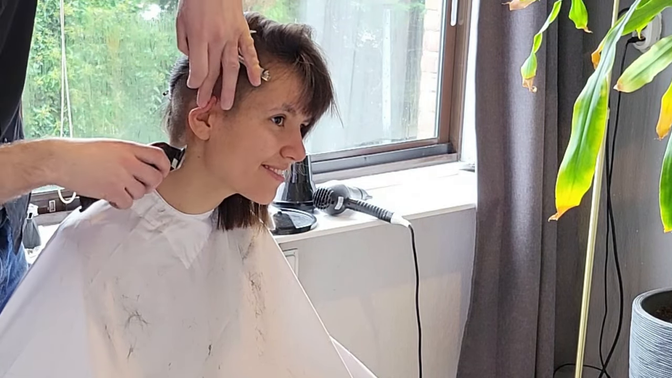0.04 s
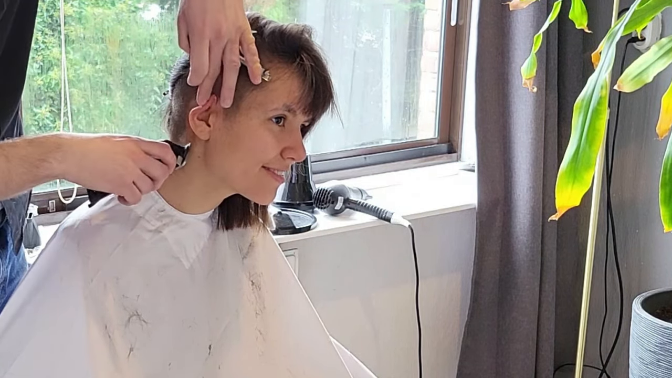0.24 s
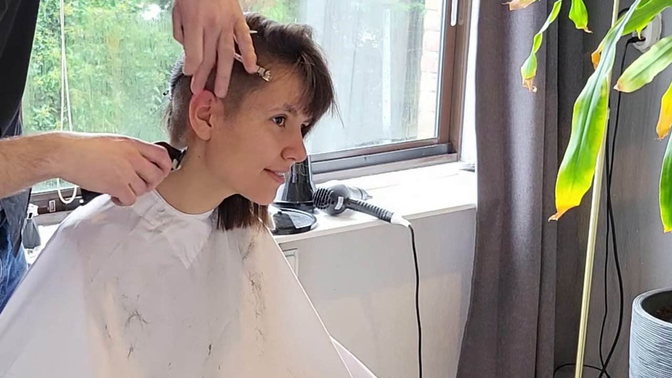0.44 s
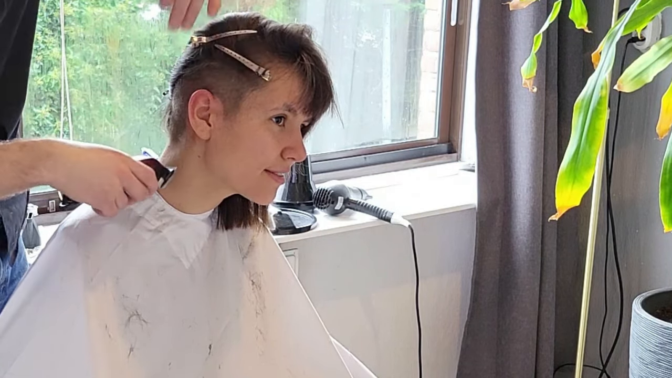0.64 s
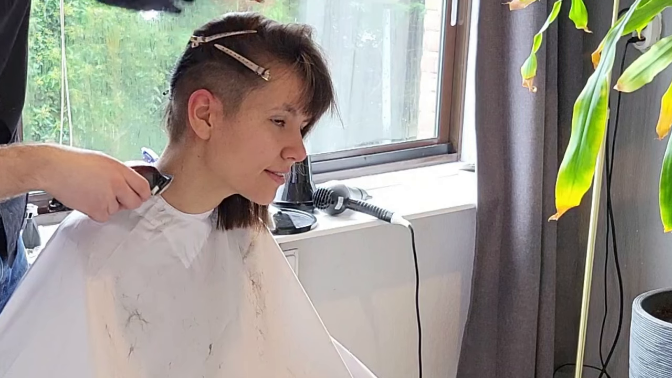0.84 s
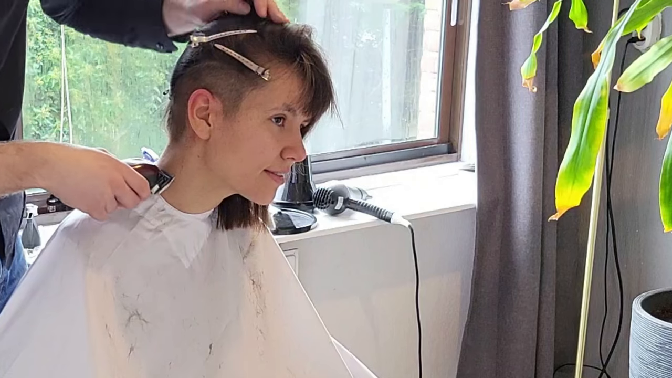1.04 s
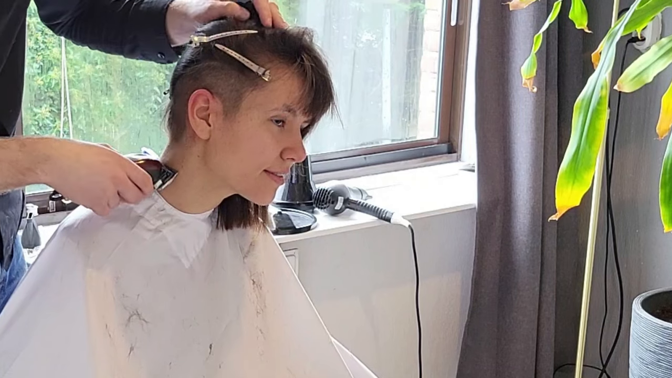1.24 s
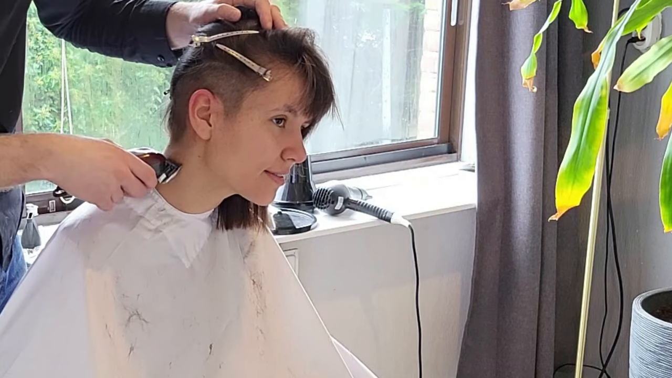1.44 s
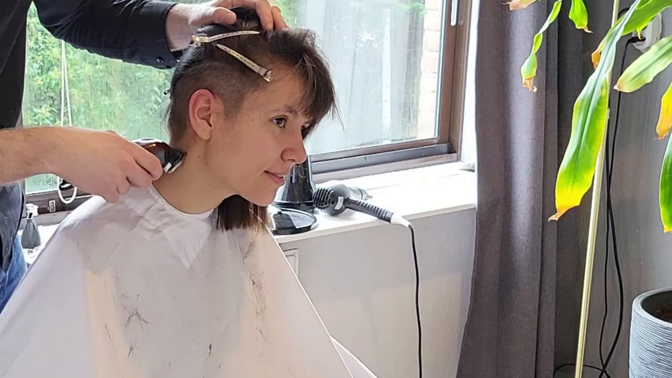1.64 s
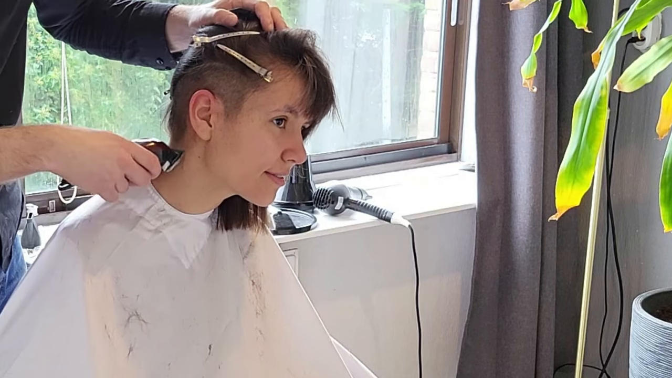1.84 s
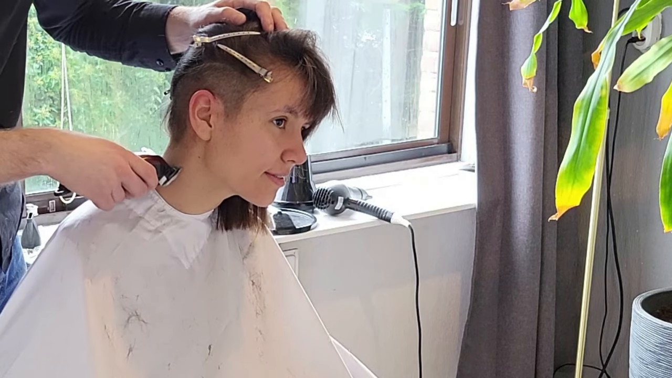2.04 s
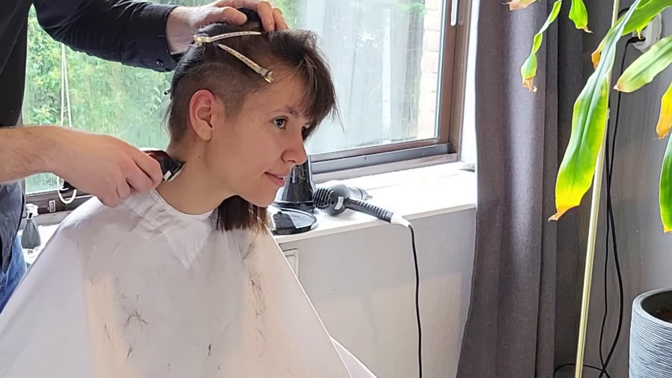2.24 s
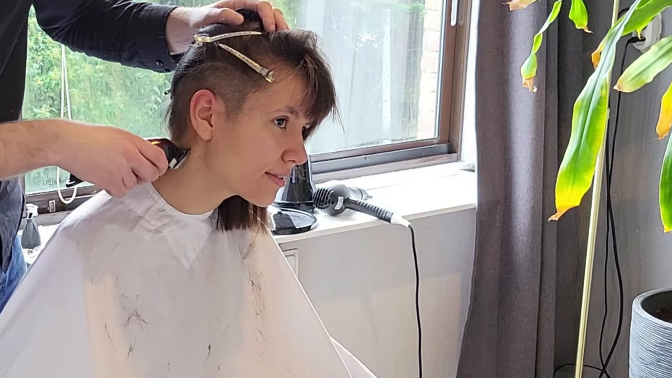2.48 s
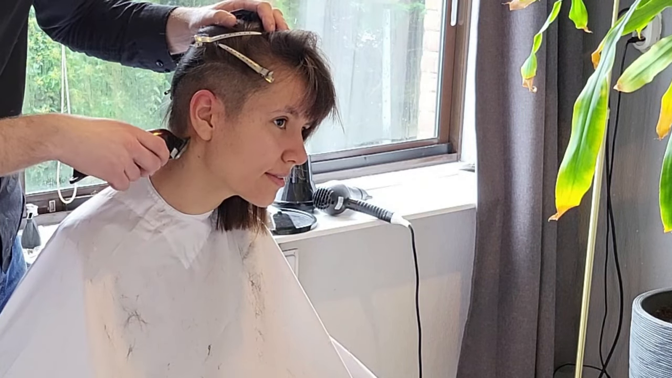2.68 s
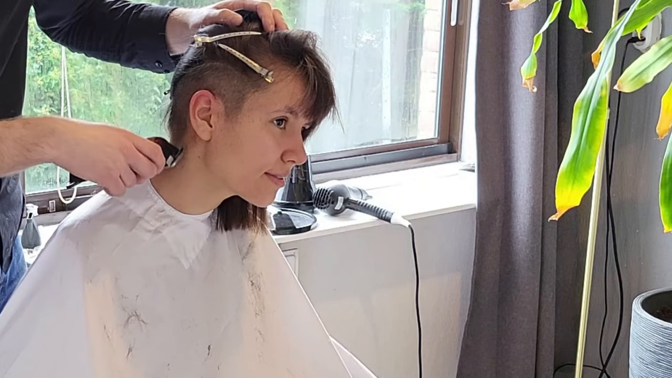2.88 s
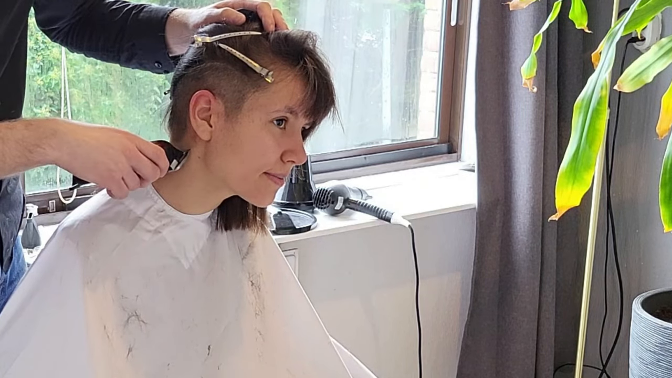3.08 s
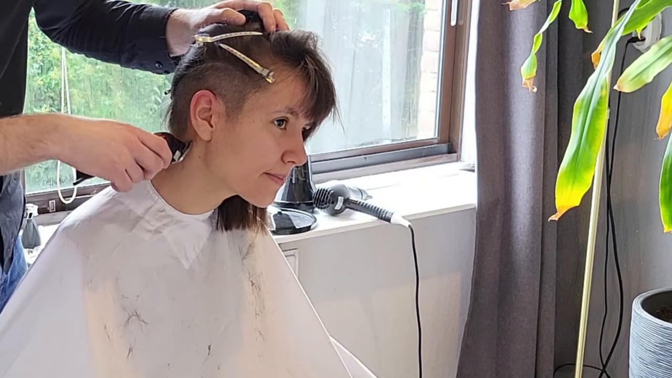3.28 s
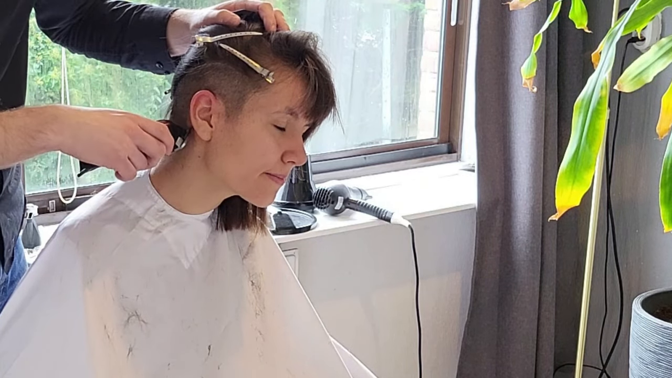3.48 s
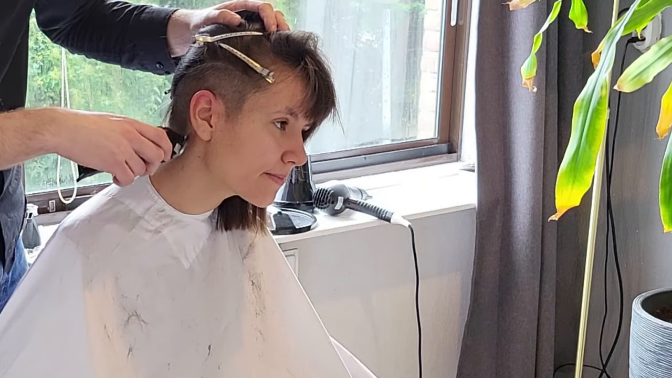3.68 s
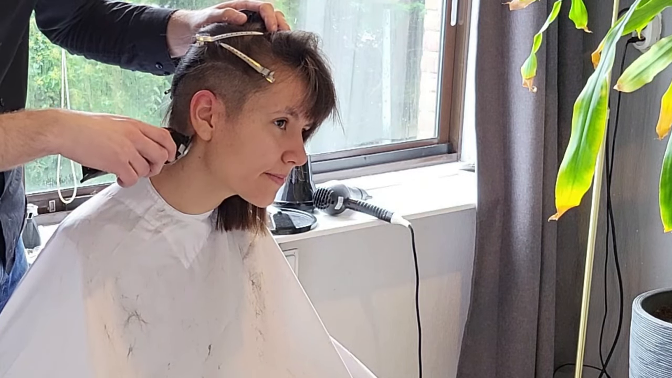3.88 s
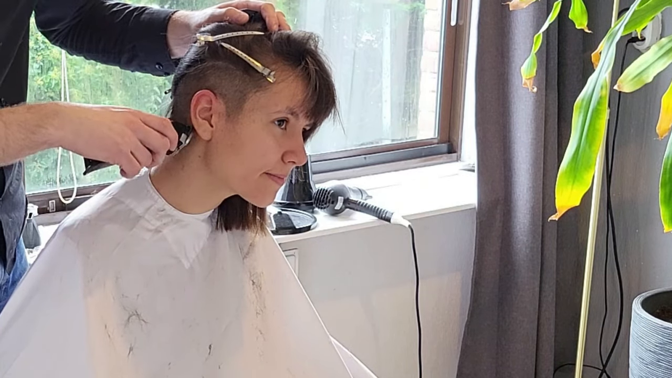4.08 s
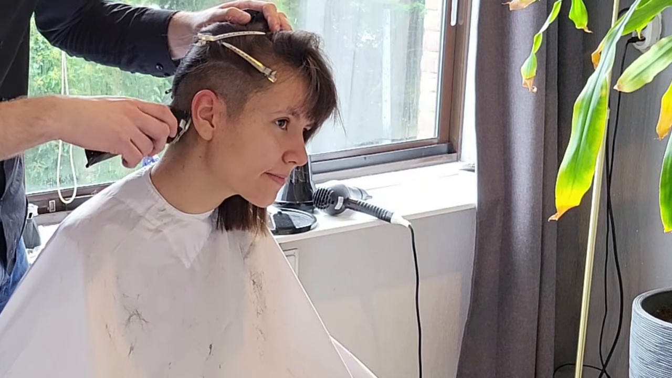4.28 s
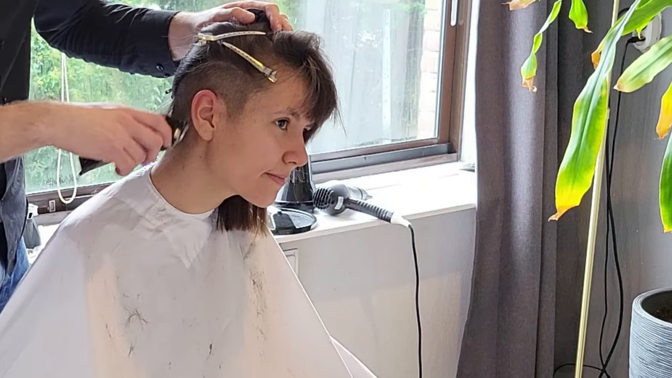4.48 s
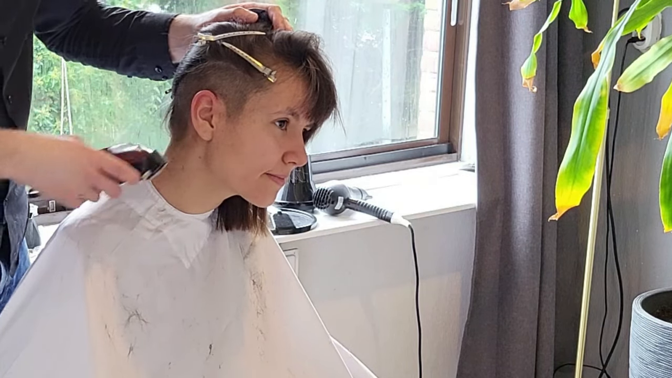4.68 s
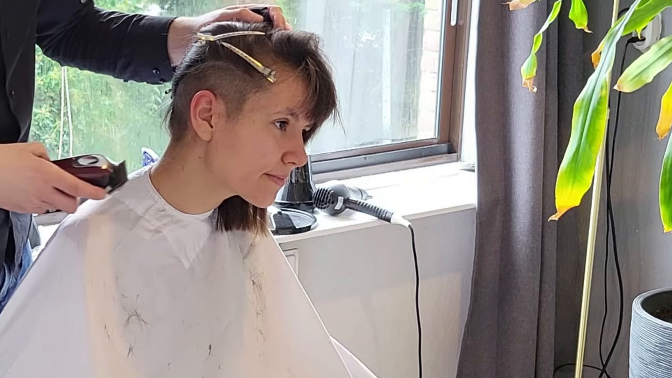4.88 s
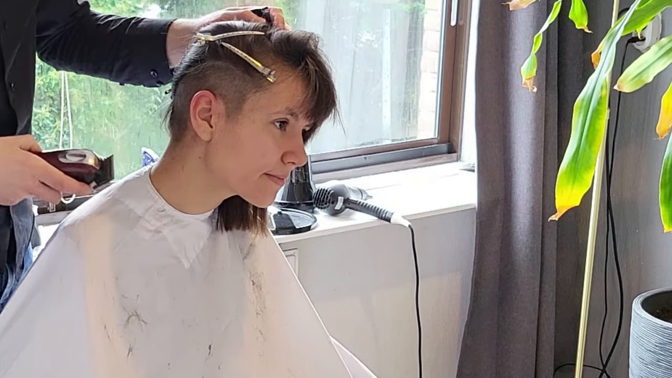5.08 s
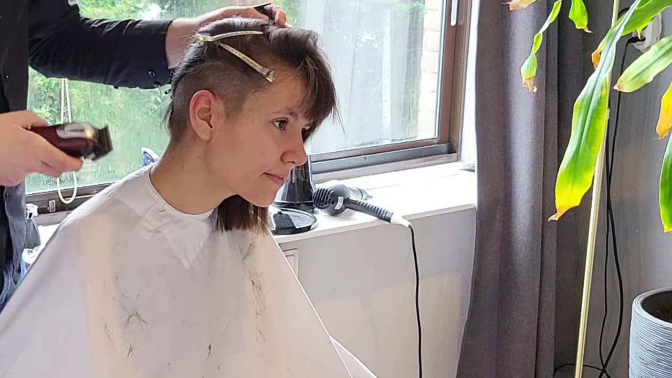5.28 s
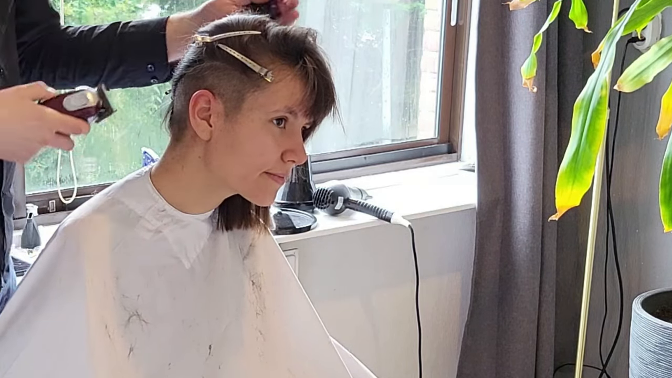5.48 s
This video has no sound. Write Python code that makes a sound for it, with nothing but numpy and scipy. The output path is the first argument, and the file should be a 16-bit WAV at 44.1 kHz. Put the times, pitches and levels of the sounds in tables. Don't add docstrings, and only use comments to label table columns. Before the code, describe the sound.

A hair clipper buzzes continuously near a neck in a small hard room, its mid-pitched hum mixed with rasp and bright blade chatter. The tone shifts as the hand presses and lifts. Near five seconds a sharp plastic switch clacks it off; a short echo fades into quiet street rumble and hiss. Close stereo microphones.

```python
import sys
import numpy as np
from scipy import signal
from scipy.fft import rfft, irfft, next_fast_len
from scipy.io import wavfile
from scipy.ndimage import uniform_filter1d, map_coordinates

SR = 44100
rng = np.random.default_rng(int(sys.argv[2]) if len(sys.argv) > 2 else 0)


def to_wav(sig):
    pcm = np.clip(np.atleast_2d(sig), -1, 1) * 32767
    pcm = np.round(pcm).astype(np.int16)
    wavfile.write(sys.argv[1], SR, pcm.T)


def to_linear_factor(level_db):
    exponent = np.asarray(level_db, float) / 20
    return 10 ** exponent


N = 243431
STOP_S = 5.072


def unit(x):
    return x / np.sqrt(np.mean(x ** 2) + 1e-20)


def along(points, hz):
    f, v = np.transpose(points)
    return np.interp(np.log(hz + 1), np.log(f + 1), v)


def curves(rows):
    s, *cols = np.transpose(rows)
    return [np.interp(np.arange(N) / SR, s, c) for c in cols]


def drift(count, size, knots):
    z = rng.standard_normal((count, 600))
    at = np.linspace(1, np.clip(knots, 2, 590), size)
    return np.array([map_coordinates(row, [at]) for row in z])


def bumps(rows):
    t = np.arange(N) / SR
    power = sum(to_linear_factor(2 * db) * np.exp(-((t - s) / half) ** 2) for s, db, half in rows)
    return np.sqrt(power)


# (f/Hz, left minus right level/dB)
LEFT_MINUS_RIGHT = [(60, 2.0), (110, 1.0), (200, 0.0), (380, 1.0), (700, -1.0), (1290, 0.0), (2380, -0.5),
                    (4400, -2.5), (8120, -2.0), (15000, -9.5)]


def coloured(x, spectrum, lean=0):
    m = next_fast_len(N + 8192)
    hz = np.fft.rfftfreq(m, 1 / SR)
    side_db = lean * along(LEFT_MINUS_RIGHT, hz) * np.array([[.5], [-.5]])
    gain = to_linear_factor(along(spectrum, hz) + side_db)
    return irfft(rfft(x, m) * gain, m)[:, :N]


def pulses(samples, sizes):
    taps = np.arange(-8, 9)
    whole = np.round(samples).astype(int)[:, None]
    off = taps - (samples[:, None] - whole)
    kernel = sizes[:, None] * np.sinc(off) * np.cos(np.pi * off / 18) ** 2
    places = np.clip(whole + taps, 0, N - 1)
    return np.bincount(places.ravel(), kernel.ravel(), N)


# (f/Hz, t60/s)
ROOM_FADE = [(300, 0.31), (2000, 0.31), (10000, 0.24)]


def tail():
    hz, t, z = signal.stft(rng.standard_normal((2, SR // 2)), SR, nperseg=256)
    fade = to_linear_factor(-60 * t / along(ROOM_FADE, hz)[:, None])
    h = signal.istft(z * fade, SR, nperseg=256)[1]
    return np.pad(h / np.linalg.norm(h[0]), ((0, 0), (90, 0)))


def room(x, hop=SR // 3):
    out = np.zeros((2, N + 2 * SR))
    x = np.pad(x, (hop, 2 * hop))
    fade = np.sin(np.pi * np.arange(2 * hop) / (2 * hop))
    for s in range(0, N + hop, hop):
        wet = signal.fftconvolve((x[s:s + 2 * hop] * fade)[None], tail(), axes=1)
        out[:, s:s + wet.shape[1]] += wet
    return out[:, hop:hop + N]


# (f/Hz, level/dB per Hz)
RUMBLE_TONE = [(15, -36), (25, -24.5), (41, -30), (54, 10), (70, 10.5), (108, -16.5), (130, -5.5),
               (170, -16.5), (290, -120)]
# (f/Hz, level/dB per Hz)
HISS_TONE = [(59, -36.5), (100, -5), (109, -7), (140, -6), (413, -21.5), (2500, -31.5), (4160, -36),
             (7530, -25), (10600, -34), (13600, -21), (15800, -35)]
# (peak t/s, peak level/dB, half length t/s)
STREET_SWELLS = [(.03, -73, .1), (.3, -68, .08), (.63, -59.5, 0.043), (.93, -67, .09), (1.45, -62.5, 0.11),
                 (1.92, -60, 0.16), (2.07, -59, .05), (2.19, -60.5, .04), (2.61, -57.5, 0.094),
                 (2.77, -64, 0.054), (2.96, -65, 0.069), (3.24, -67, .06), (3.44, -62, 0.042),
                 (3.72, -60.5, 0.12), (3.87, -68, .035), (4.09, -61, .06), (4.3, -56, 0.053),
                 (4.55, -56, .04), (4.7, -60, 0.1), (5.11, -53, 0.053), (5.42, -65.5, 0.048)]
LULL_DB = -75.5
HISS_DB, SETTLE_S, SETTLE_DB = -68.5, 5.31, -6.5
STIR_S, STIR_DB, STIR_HALF_S = 5.45, -69.5, .055


def background():
    shared, own = rng.standard_normal(N), rng.standard_normal((2, N))
    rumble = unit(coloured(shared + .35 * own, RUMBLE_TONE, lean=1))
    loudness = np.sqrt(np.abs(uniform_filter1d(rumble[0] ** 2, size=3000))) + 0.24
    street = np.hypot(to_linear_factor(LULL_DB), bumps(STREET_SWELLS)) * unit(rumble / loudness)
    hiss = unit(coloured(rng.standard_normal((2, N)) + shared[::-1], HISS_TONE))
    settled = np.clip((np.arange(N) / SR - STOP_S) / (SETTLE_S - STOP_S), 0, 1) ** 2
    stir = bumps([(STIR_S, STIR_DB, STIR_HALF_S)])
    rustle = np.hypot(to_linear_factor(HISS_DB + SETTLE_DB * settled), stir)
    return street + rustle * hiss


# (t/s, level/dB)
SLIDER_BLOWS = [
    (5.0748, -9.5),
    (5.0767, -10),
    (5.0779, -10.5),
    (5.0788, -12),
    (5.0795, -18.5),
]
# (f/Hz, level/dB per Hz)
CLACK_TONE = [(300, -35.5), (600, -33.5), (1150, -22.5), (2000, -21), (2700, -16), (3600, -9.5),
              (4600, -16), (6200, -15.5), (7700, -6), (9300, -24), (11500, -5), (14300, -4), (15700, -10)]


def switch():
    blows, t = np.zeros((2, N)), np.arange(300) / SR
    for s, db in SLIDER_BLOWS:
        crack = to_linear_factor(db - 60 * t / 0.008) * rng.standard_normal((2, len(t)))
        blows[:, round(s * SR):][:, :len(t)] += crack
    wet = signal.fftconvolve(blows, tail(), axes=1)[:, :N]
    crossed = signal.fftconvolve(blows[::-1], tail(), axes=1)[:, :N]
    return to_linear_factor(5.0) * coloured(blows + wet + crossed, CLACK_TONE, lean=1)


# (f/Hz, level/dB, t60/s)
CASE_RINGS = [
    (774, -47.5, 0.024),
    (1156, -39, .035),
    (3670, -34, 0.045),
]


def knock():
    t = np.arange(N) / SR - SLIDER_BLOWS[0][0]
    ring = sum(to_linear_factor(db - 60 * np.abs(t) / t60) * np.sin(2 * np.pi * hz * t) for hz, db, t60 in CASE_RINGS)
    ring = ring * (t > 0)
    return np.array([ring, np.roll(ring, -9)])


# (f/Hz, level/dB per Hz)
RASP_TONE = [(150, -40.5), (300, -1), (700, -4), (1300, 5), (2000, 8), (2800, -13), (4500, -49)]


def rasp(turns):
    flare = 1 + np.cos(4 * np.pi * turns)
    since = np.clip(np.arange(N) / SR - STOP_S, 0, None)
    noise = unit(coloured(flare * rng.standard_normal((2, N)), RASP_TONE))
    return to_linear_factor(-58.5 - 60 * since / .19) * noise


# (multiple of the shaft speed, left level/dB, right level/dB, left lead/rad)
SHAFT_ORDERS = [(3, -76, -77, 0.1), (4, -75, -73, 0.4), (5, -62, -65, 2.2), (6, -65, -67, -0.2),
                (7, -67, -60, -0.5), (8, -64, -70, -1.8), (9, -62, -65, -0.5), (10, -65, -64, -1.2),
                (11, -56, -60, -0.8), (12, -61, -56, -2.5), (13, -54, -52, 1.4), (14, -54, -54, 2.9),
                (15, -59, -55, -2.5), (16, -51, -53, -0.6), (17, -50, -53, -1.9), (18, -56, -58, -2.6),
                (19, -55, -53, -2.8), (20, -53, -51, -2.9), (21, -56, -52, 0.7), (22, -60, -60, 2.3),
                (23, -48, -51, 2.2), (24, -52, -53, 0.8), (25, -58, -58, 1.7), (26, -53, -55, -1.3),
                (29, -62, -58, -1.6), (30, -65, -65, 0.5), (31, -61, -60, -0.1), (32, -59, -59, -0.0),
                (33, -56, -54, 0.6), (34, -60, -56, 0.0)]
HUM_FADE = [0.32, 0.18, 0.15, 0.28, 0.18]


def hum(turns, bands_db):
    step = 64
    out = np.zeros((len(bands_db), 2, N))
    t = np.arange(N)
    for k, left_db, right_db, lead in SHAFT_ORDERS:
        loose = np.clip(.032 * k, .35, .68)
        re, im = drift(count=4, size=N // step + 2, knots=10 + 1.096 * k).reshape(2, 2, -1)
        gain = np.sqrt(1 - loose ** 2) + loose * (re + 1j * im) / np.sqrt(2)
        phase = 2 * np.pi * rng.random() + lead * np.array([[1], [0]])
        gain = gain * to_linear_factor([[left_db], [right_db]]) * np.exp(1j * phase)
        spin = np.exp(2j * np.pi * k * turns)
        band = 1 if k == 7 else [0, 4, 2, 3][np.searchsorted([5.5, 14.5, 21.5], k)]
        out[band] += [(np.interp(t / step, np.arange(len(g)), g) * spin).real for g in gain]
    since = np.clip(t / SR - STOP_S, 0, None)
    layers = zip(out, bands_db, HUM_FADE)
    return sum(to_linear_factor(db + 3.0 - 60 * since / t60) * unit(layer) for layer, db, t60 in layers)


# (angle/turns, level/dB)
TOOTH_STRIKES = [(.08, 3.5), (.12, 0.5), (.2, -6), (0.273, -6), (0.341, 1), (0.432, -16.5), (.53, 0.5),
                 (.62, -1.5), (0.681, -9.5), (0.761, -3.5), (0.859, -7), (0.951, -13.5)]
# (f/Hz, level/dB per Hz)
CHATTER_TONE = [(300, -54), (1000, -17), (2050, -17.5), (2500, -9.5), (3000, -11.5), (3400, -14),
                (3800, -7), (4600, -9.5), (6200, -8), (7600, -10.5), (8900, -18), (11000, -16.5),
                (13900, -5.5), (15500, -13.5)]


def chatter(turns, level_db):
    angle, db = np.transpose(TOOTH_STRIKES)
    teeth = len(angle)
    rounds = np.arange(int(turns[round(STOP_S * SR)]))
    creep = .002 * drift(count=teeth, size=len(rounds), knots=20).T
    slack = .0007 * rng.standard_normal(creep.shape)
    slow_db = 2.8 * drift(count=teeth, size=len(rounds), knots=26).T
    size = to_linear_factor(db + slow_db + 1.6 * rng.standard_normal(creep.shape))
    size = size / np.linalg.norm(size, axis=1, keepdims=True)
    at = np.interp(rounds[:, None] + angle + creep + slack, turns, np.arange(N))
    running = np.arange(N) < STOP_S * SR
    scrape = to_linear_factor(-11.5) * rng.standard_normal(N) * running
    strikes = unit(pulses(at.ravel(), size.ravel()))
    source = (strikes + scrape) * to_linear_factor(level_db)
    blade = rng.standard_normal((2, 200)) * to_linear_factor(-60 * np.arange(200) / SR / .002)
    direct = signal.fftconvolve(source[None], blade / np.linalg.norm(blade[0]), axes=1)[:, :N]
    heard = coloured(to_linear_factor(-2.5) * direct + room(source, hop=SR // 3), CHATTER_TONE, lean=1)
    return unit(heard) * to_linear_factor(np.mean(level_db) + 3.5)


# (t/s, f/Hz in turns per second)
SHAFT_SPEED = [(0.05, 74.0), (0.2, 73.4), (1.16, 74.4), (1.38, 73.3), (1.99, 73.9), (2.18, 74.4),
               (2.34, 73.9), (2.73, 73.9), (2.9, 73.1), (3.41, 73.7), (3.73, 73.6), (3.89, 74.0),
               (4.55, 72.9), (4.79, 73.5), (5.04, 73.7)]
# (t/s, pressure on the skin 0-1, case turned to the listener 0-1)
HAND_MOVES = [(0, 0.35, .96), (.22, 0.55, 0.58), (.51, .38, .54), (.66, 0.27, 0.94), (.99, 0.33, 0.84),
              (1.3, 0.36, 0.74), (1.44, 0.58, 0.26), (1.7, 0.37, .08), (1.85, 0.3, 0.8), (2.11, 0.27, 0.87),
              (2.78, 0.37, 0.67), (2.94, 0.75, .96), (3.05, 0.68, 0.77), (3.48, 0.3, 0.59),
              (3.99, 0.33, 0.7), (4.33, 0.45, 0.91), (4.68, 0.48, 0.7), (5.06, 0.13, 0.4)]
LOW_HUM_DB = -52
CASE_DB, CASE_PRESS_DB = -53.5, 15.5
UPPER_DB, UPPER_FACE_DB = -58, 13.5
LOW_MODE_DB, LOW_FACE_DB, LOW_LIFT_DB = -68, 3, 12
HIGH_MODE_DB, HIGH_FACE_DB, HIGH_PRESS_DB, HIGH_LIFT_DB = -59, 4.5, -26.5, -21
LIFT_S, LIFT_TAKES_S = 4.78, 0.36
BLADE_DB, BLADE_PRESS_DB = -39.5, 0.05


def clipper():
    speed_hz = uniform_filter1d(curves(SHAFT_SPEED)[0], size=4000)
    turns = np.cumsum(speed_hz) / SR
    press, face = curves(HAND_MOVES)
    lift = np.clip((np.arange(N) / SR - LIFT_S) / LIFT_TAKES_S, 0, 1)
    low_mode_db = LOW_MODE_DB + LOW_FACE_DB * face + LOW_LIFT_DB * lift
    high_mode_db = HIGH_MODE_DB + HIGH_FACE_DB * (face - 1) + HIGH_PRESS_DB * press ** 2 + HIGH_LIFT_DB * lift
    case_db = CASE_DB + CASE_PRESS_DB * press
    upper_db = UPPER_DB + UPPER_FACE_DB * face
    motor = hum(turns, [low_mode_db, high_mode_db, case_db, upper_db, LOW_HUM_DB])
    return motor + rasp(turns) + chatter(turns, BLADE_DB + BLADE_PRESS_DB * press)


def scene():
    return clipper() + switch() + knock() + background()


def top_cut(x):
    return signal.sosfilt(signal.butter(12, 16480, fs=SR, output="sos"), x)


def record(dry):
    top_hz = 15820
    limit = [(20, 0), (top_hz - 60, 0), (top_hz + 60, -40)]  # (f/Hz, level/dB)
    return top_cut(coloured(dry, limit))


dry = scene()
out = record(dry)
to_wav(out)
```